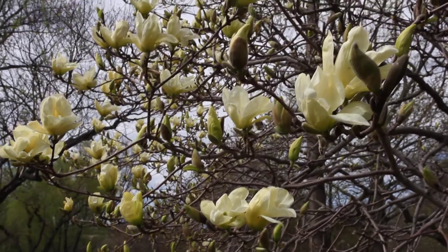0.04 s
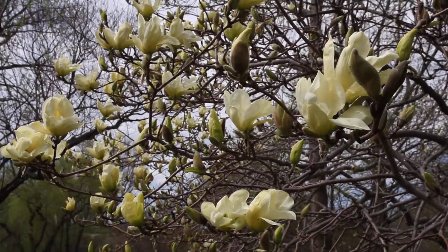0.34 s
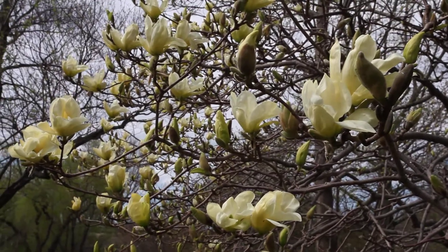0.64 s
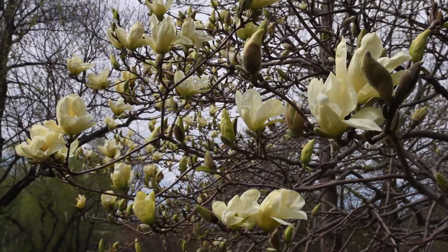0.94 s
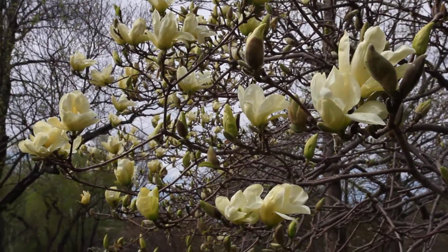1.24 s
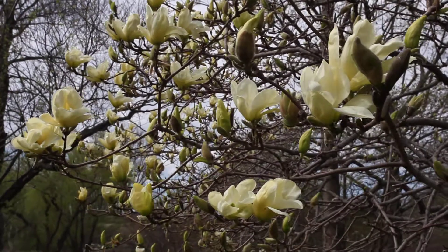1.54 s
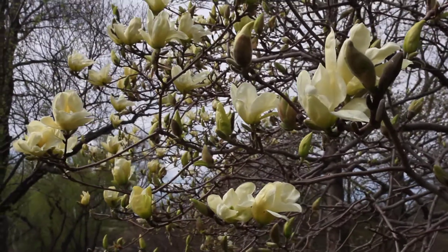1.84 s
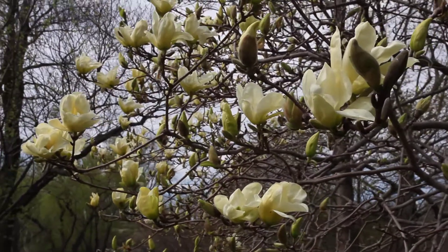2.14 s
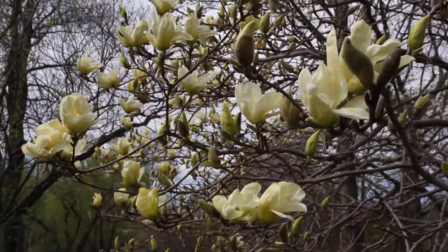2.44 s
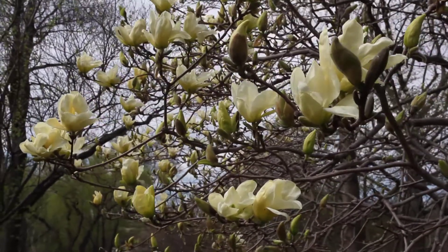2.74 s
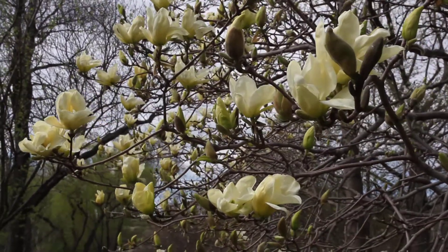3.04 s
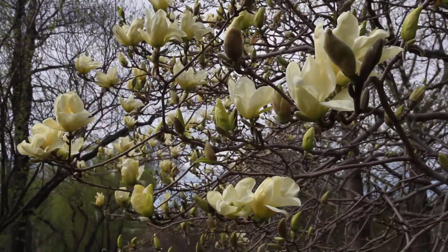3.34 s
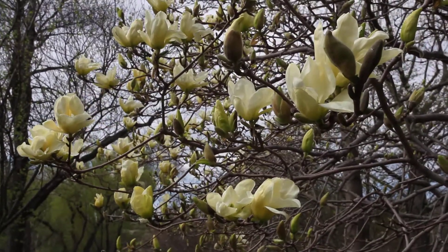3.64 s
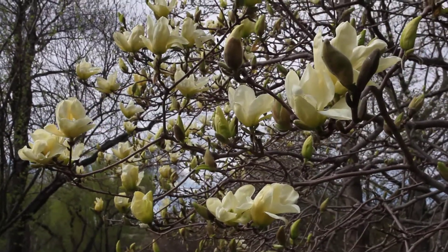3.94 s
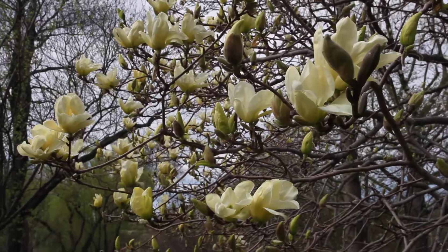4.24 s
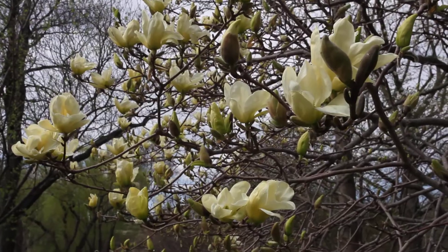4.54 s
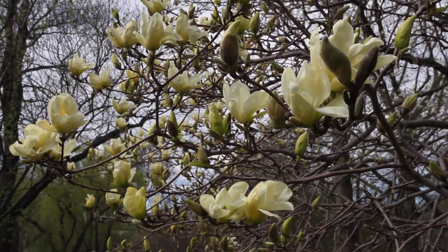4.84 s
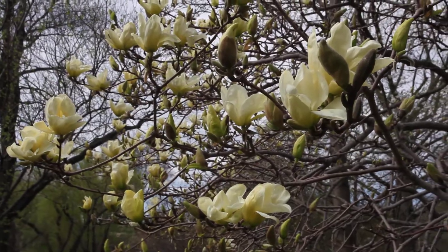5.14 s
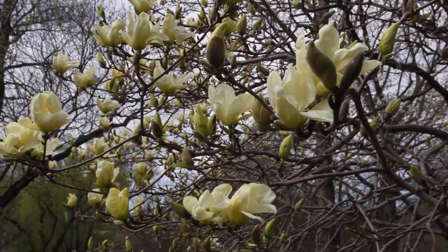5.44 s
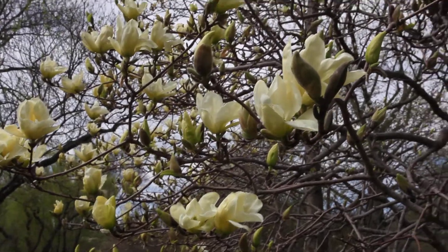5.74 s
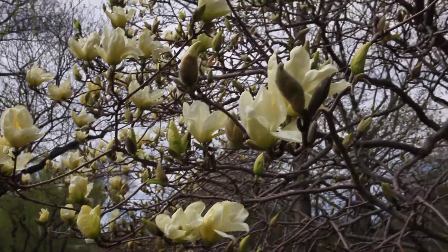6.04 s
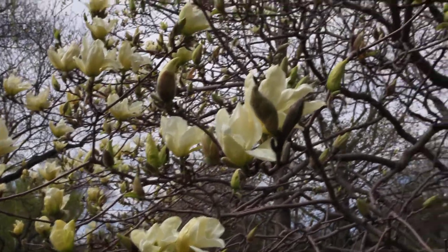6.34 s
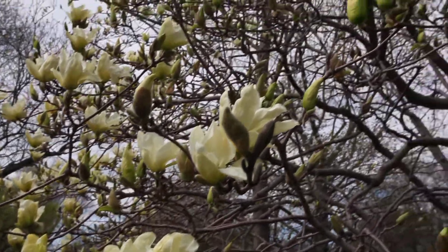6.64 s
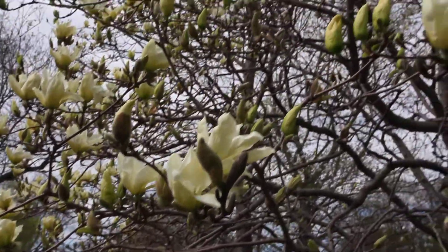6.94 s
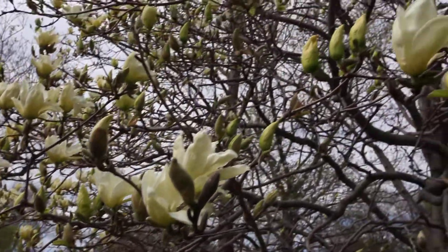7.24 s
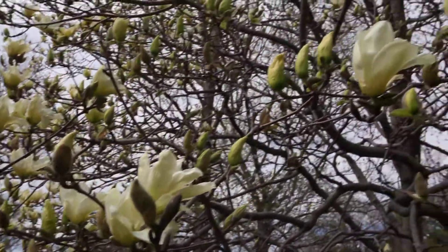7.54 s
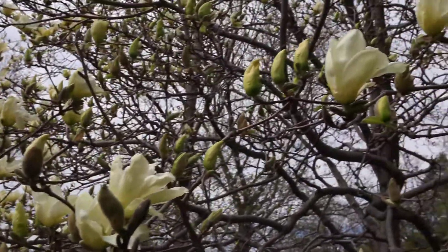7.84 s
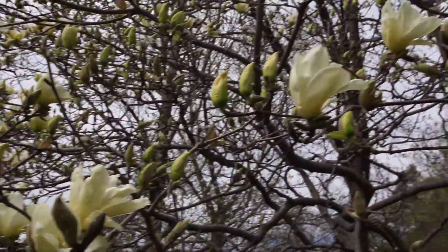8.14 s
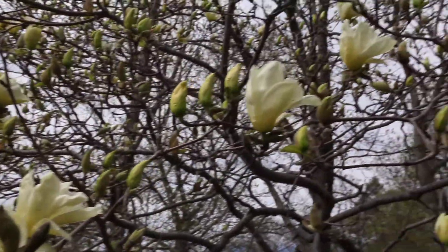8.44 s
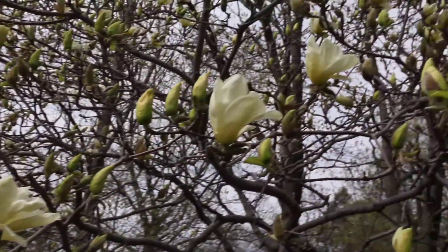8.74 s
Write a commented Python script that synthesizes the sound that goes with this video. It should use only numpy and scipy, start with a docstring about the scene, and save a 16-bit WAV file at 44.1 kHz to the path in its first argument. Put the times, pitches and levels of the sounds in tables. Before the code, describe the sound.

Songbirds sing short buzzy trills, whistles and sharp chips in a garden, over a faint steady haze of distant traffic.

```python
"""Blackbirds sing in a spring garden among tall bare trees, each voice made by airflow in the syrinx.
A buzzy trill opens over a far chorus and a haze of distant traffic. Soft mewing, whistles and far
engines follow, then the chatter and sharp chips of nearer birds, and small birds' slurs, two-note
calls and flicks. Songs recur, a few whistled notes and then a trill, and the chatter ends in a
fading series. Throughout, trunks and twigs scatter every call into reverberation."""
import sys
import numpy as np
from scipy import signal
from scipy.fft import rfft, irfft, next_fast_len
from scipy.io import wavfile

SR = 44100
rng = np.random.default_rng(int(sys.argv[2]) if len(sys.argv) > 2 else 0)


def digitize_waveform(pressure):
    """Quantize a signal to 16-bit integers and store it at the path in sys.argv[1].

    Rows of a 2-D input are taken as channels; values are limited to [-1, 1].
    """
    field = np.atleast_2d(pressure).T
    bounded = np.clip(field, -1, 1)
    quanta = np.round(bounded * 32767).astype(np.int16)
    wavfile.write(sys.argv[1], SR, quanta)


N = 392490
TIME = np.arange(N) / SR


def from_db(db):
    """Level is logarithmic: 20 dB is a tenfold amplitude."""
    return 10 ** (np.asarray(db) / 20)


def rms_one(x):
    """Normalisation to unit power."""
    return x / np.sqrt(np.mean(x ** 2) + 1e-20)


def noise(spectrum):
    """Spectral shaping: white noise weighted by a curve of level against frequency; rms 1."""
    size = next_fast_len(N)
    hz, db = np.transpose(spectrum)
    bins = np.maximum(np.fft.rfftfreq(size, 1 / SR), 1)
    gain = from_db(np.interp(np.log(bins), np.log(hz), db, right=-np.inf))
    return rms_one(irfft(rfft(rng.standard_normal(size)) * gain, size)[:N])


def flutter(rate_hz):
    """Random modulation: noise low-passed at the given rate; rms 1."""
    lowpass = signal.butter(2, rate_hz, fs=SR, output="sos")
    return rms_one(signal.sosfilt(lowpass, rng.standard_normal(N)))


def span(start, length):
    """Time window: the samples of a call and its progress u from 0 to 1."""
    at = np.arange(max(int(start * SR), 0), min(int((start + length) * SR), N))
    return at, np.clip((at / SR - start) / length, 0, 1)


def swell(u, rise, fall):
    """Amplitude envelope: a smooth rise and fall over shares of a call; silent outside 0-1."""
    return np.sin(np.pi / 2 * np.clip(np.minimum(u / rise, (1 - u) / fall), 0, 1)) ** 2


def glide(u, first, middle, last):
    """Parabolic contour through three points."""
    return first + (last - first) * u + (2 * middle - first - last) * 2 * u * (1 - u)


def syrinx(hz, shake, overtone_db=-33):
    """Frequency modulation: a nearly pure tone, its pitch shaken by a share of itself; rms about 1."""
    phase = 2 * np.pi * np.cumsum(hz * (1 + shake)) / SR
    return np.sqrt(2) * (np.sin(phase) + from_db(overtone_db) * np.sin(2 * phase))


def trills(whip_hz=5600, middle_hz=3700, top_hz=5000, depth=0.1153, sag=0.0308, grain_db=3.5, fade_db=2):
    """Fast pulsing is heard as buzz: each cycle holds a low note, top note, down-whip and middle note."""
    # trills: (start [s], end [s], first rate [pulses/s], last rate [pulses/s], low note [Hz],
    # relative levels of low note [dB], whip [dB], middle note [dB] and top note [dB], rasp [0-1])
    songs = [ (-0.048, 0.118, 55, 66, 2830, -20, -22.5, -22, -29, 0.14),
             (1.746, 2.233, 40, 40.7, 2880, -29, -23.5, -27, -33, 0.56),
             (2.113, 2.669, 53, 66, 2734, -28.5, -34, -41, -33, 0.36),
             (3.049, 3.582, 63.4, 67, 2828, -22.5, -29, -27.5, -29.5, 0.42),
             (4.07, 4.286, 100, 68, 2624, -29, -44, -32.5, -39, 0.57),
             (4.943, 5.485, 62, 52.5, 2708, -25.5, -23.5, -27.5, -33.5, 0.36),
             (7.309, 7.701, 38.3, 42, 2910, -25, -36, -24, -27, 0.53)]
    out, shakes, stagger = np.zeros(N), [flutter(660) for _ in range(4)], flutter(50)
    grains, stray = [flutter(330) for _ in range(4)], flutter(77)
    for start, end, first, last, low_hz, low_db, whip_db, middle_db, top_db, rasp in songs:
        at, u = span(start, end - start)
        cycle = (end - start) * (first * u + (last - first) * u * u / 2)
        cycle += 0.022 * (1 + 4 * rasp) * stagger[at]   # uneven pulse timing
        # each part's progress, from its onset and length as shares of a cycle
        low, top = (cycle % 1) / 0.68, ((cycle - 0.3) % 1) / 0.85
        whip, middle = ((cycle - 0.55) % 1) / 0.24, ((cycle - 0.72) % 1) / 0.62
        parts = [(low, low_hz * glide(np.minimum(low, 1), 1.07, 0.99, 1.04), low_db),
                 (whip, whip_hz + (middle_hz - whip_hz) * np.minimum(whip, 1), whip_db),
                 (middle, middle_hz * (1.04 - 0.08 * np.minimum(middle, 1)), middle_db),
                 (top, top_hz * (1.06 - 0.16 * np.minimum(top, 1)), top_db)]
        tension = 1 + sag * (0.5 - u) + 0.012 * stray[at]   # the pitch sinks as the air runs out
        envelope = swell(u, 0.027, 0.037) * from_db(-fade_db * (2 + u))
        for (progress, hz, db), shake, grain in zip(parts, shakes, grains):
            pulses = from_db(db + grain_db * (grain[at] - 0.6)) * swell(progress, 0.42, 0.059)
            tone = syrinx(hz * tension, depth * rasp * shake[at], overtone_db=-53)
            out[at] += envelope * pulses * tone
    return out


def traffic():
    """Many distant vehicles sum to broadband noise: a wavering rush of tyres over a low rumble."""
    # tyre rush and low rumble: (frequency [Hz], relative spectral density [dB])
    rush_spectrum = [(150, -31.5), (380, -13.5), (480, -6.5), (590, -6), (730, -2), (950, 0.5), (1100, -1),
                     (1500, -7), (2200, -15), (3500, -21)]
    rumble_spectrum = [(15, -40), (25, -14), (54, -2), (90, 2.5), (140, -0.5), (180, 0), (260, -4.5),
                       (380, -13.5), (700, -43)]
    # slow drift of the traffic: (time [s], rush level [dB], relative rumble level [dB])
    levels = [(0.0, -36, -41.5), (2.35, -37.5, -45.5), (4.71, -37.5, -45.5), (7.86, -40, -45),
              (8.9, -41.5, -45.5)]
    seconds, rush_db, rumble_db = np.transpose(levels)
    rush = noise(rush_spectrum) * from_db(np.interp(TIME, seconds, rush_db) + flutter(4.7))
    rumble = noise(rumble_spectrum) * from_db(np.interp(TIME, seconds, rumble_db) + 0.77)
    return rush + rumble


def background_hiss(level_db=-46, follows=0.83, waver_db=2.5):
    """Incoherent summation: far birds and leaves blur into a high hiss, which swells now and then."""
    # far birds and leaves: (frequency [Hz], relative spectral density [dB])
    spectrum = [(1500, -11.5), (2200, 1), (3000, 1.5), (4000, 4.5), (5300, 2.5), (7000, -2.5), (8500, -8.5),
                (10000, -23), (14000, -30)]
    # level of the high background hiss, swelling briefly under the whistles and trills:
    # (time [s], relative level [dB])
    levels = [(0.0, -55), (1.93, -50), (2.33, -54), (2.77, -54), (3.05, -37.5), (3.37, -51), (4.07, -40.5),
              (4.26, -52.5), (4.68, -60.5), (5.65, -47.5), (6.22, -56), (7.49, -55.5), (7.91, -58.5),
              (8.9, -47)]
    hiss_db = np.interp(TIME, *np.transpose(levels))
    drift_db = follows * (hiss_db - hiss_db.mean())
    return noise(spectrum) * from_db(level_db + drift_db + waver_db * flutter(17))


def air(level_db=-64.5):
    """Noise floor: the steady hiss of still air and microphone."""
    # hiss: (frequency [Hz], relative spectral density [dB])
    spectrum = [(2000, -5), (10000, -1), (13000, -5), (16000, -9)]
    return from_db(level_db) * noise(spectrum)


def far_birds(count=230, level_db=-47, low_hz=3000, high_hz=7200):
    """A random point process: faint slurs from all over the wood, at independent times and pitches."""
    out, shake = np.zeros(N), flutter(360)
    for when, length, pitch, slope, faintness in rng.random((count, 5)):
        at, u = span(when * N / SR, 0.025 + 0.066 * length)
        hz = low_hz * (high_hz / low_hz) ** pitch * (1 + 0.34 * (slope - 0.65) * u)
        envelope = from_db(level_db - 20 * faintness) * swell(u, 0.1, 0.57)
        out[at] += envelope * syrinx(hz, 0.0094 * shake[at])
    return out


def mewing(start_s, end_s, level_db, pitch_hz=1330, arch=0.025, notes_per_s=4.8):
    """A harmonic series without its fundamental: soft ragged arches, the third harmonic strongest."""
    out, shake, ragged = np.zeros(N), flutter(380), flutter(34)
    at, u = span(start_s, end_s - start_s)
    note = (u * (end_s - start_s) * notes_per_s) % 1
    pitch = pitch_hz * glide(note, 1 - arch, 1 + arch, 1 - arch)
    for harmonic, db in [(2, -10), (3, 0), (4, -7), (5, -8)]:
        envelope = from_db(level_db + db + 4 * ragged[at]) * swell(note, 0.4, 0.4)
        out[at] += envelope * syrinx(harmonic * pitch, 0.035 * shake[at])
    return out


def whistles(depth=0.112):
    """Linear frequency sweeps: clear notes, most of them leading into a trill."""
    # whistles: (start [s], length [s], first pitch [Hz], last pitch [Hz], level [dB], rasp [0-1])
    notes = [ (0.109, 0.19, 5270, 5080, -40.5, .2), (1.563, 0.049, 2130, 1920, -33.5, .5),
             (1.6, 0.077, 2467, 2520, -37.5, .35), (1.576, 0.18, 7410, 7520, -48, 0.13),
             (1.666, 0.088, 2080, 2213, -23, 0.11), (1.739, 0.12, 2230, 2280, -45, 0.25),
             (1.74, 0.025, 4970, 5400, -36, .2), (1.852, 0.05, 2285, 2284, -25.5, .02),
             (2.893, 0.082, 2432, 2420, -24.5, 0.12), (2.998, 0.022, 2545, 2630, -22.5, 0.1),
             (3.021, 0.062, 6230, 6300, -30.5, 0.84), (3.027, 0.27, 7500, 7200, -44.5, 0.7),
             (3.428, 0.096, 3560, 3575, -33, 0.2), (3.794, 0.098, 2300, 2360, -31.5, 0.44),
             (3.887, 0.099, 2385, 2430, -31, 0.23), (4.811, 0.03, 2620, 2500, -36, 0.5),
             (4.832, 0.2, 5080, 5460, -43, 0.3), (4.873, 0.024, 2645, 2670, -27.5, 0.2),
             (6.701, 0.23, 2850, 2620, -50, 0), (6.925, 0.16, 4930, 4850, -45, .15),
             (7.099, 0.065, 2547, 2330, -33, 0.4), (7.171, 0.068, 1640, 1720, -33.5, 0.1),
             (7.203, 0.12, 2720, 2760, -40, 0.06), (7.265, 0.031, 2230, 2440, -28, 0.6),
             (7.296, 0.022, 4970, 5400, -31, .2), (7.325, 0.062, 2470, 2530, -32, 0.5)]
    out, shake = np.zeros(N), flutter(530)
    for start, length, first, last, db, rasp in notes:
        at, u = span(start, length)
        tone = syrinx(first + (last - first) * u, depth * rasp * shake[at])
        out[at] += from_db(db) * swell(u, 0.25, 0.26) * tone
    return out


def engines(wander=0.0433, climb_hz_per_s=31):
    """Frequency jitter blurs the drones of far engines, which climb in pitch as they swell and fade."""
    # drones: (start [s], length [s], centre pitch [Hz], peak level [dB])
    drones = [(0.201, .9, 275, -45), (1.057, 0.58, 337, -47.5), (3.004, 0.58, 298.4, -50),
              (5.549, 0.61, 254, -46.5), (6.452, 0.69, 463, -47), (7.75, .5, 505, -45)]
    out, shake = np.zeros(N), flutter(38.4)
    for start, length, hz, db in drones:
        at, u = span(start, length)
        pitch = (hz + climb_hz_per_s * length * (u - 0.5)) * (1 + wander * shake[at])
        out[at] += from_db(db) * swell(u, 0.37, 0.42) * np.sin(2 * np.pi * np.cumsum(pitch) / SR)
    return out


def chatter(rise=0.062, buzz_hz=390, buzz_depth=0.69, lower_db=-14, rasp_s=0.0472, rasp_hz=4450):
    """Amplitude modulation makes a rising note nasal; over a lower voice, it cracks into a rasp."""
    # chatter notes: (start [s], length [s], pitch [Hz], level [dB])
    notes = [ (0.278, .036, 3720, -33.5), (1.842, .016, 3636, -20.5), (3.288, .036, 3950, -36),
             (3.335, 0.02, 3684, -25.5), (3.495, .025, 3620, -24.5), (3.654, 0.015, 3660, -27),
             (3.813, 0.022, 3550, -25.5), (3.977, 0.023, 3680, -24.5), (4.036, 0.03, 3630, -24.5),
             (4.163, 0.027, 3770, -24.5), (5.124, .031, 3915, -25), (5.287, 0.012, 4280, -25.5),
             (5.443, 0.015, 4290, -24), (6.48, 0.0085, 3440, -23.5), (7.303, .026, 3580, -30.5),
             (7.979, 0.013, 3520, -38)]
    # a clipped note lifts the lower voice: (note length [s], lower voice pitch [Hz])
    lower_voice = [(.013, 2863), (.019, 2043)]
    fading_series = [(8.142 + k * 0.1305, 0.01, 3600, -25 - 2.05 * k) for k in range(6)]
    out, shake, whim = np.zeros(N), flutter(1070), flutter(4)
    nasal = 1 + buzz_depth * np.sin(2 * np.pi * buzz_hz * TIME)
    lengths, lower_pitches = np.transpose(lower_voice)
    for start, length, hz, db in notes + fading_series:
        at, u = span(start, length)
        harsh = np.interp(length, lengths, [0.052, 0.011])   # clipped notes are harsher
        pitch = hz * (1 + rise * (1 + 0.53 * whim[at]) * (u - 0.5))
        note = nasal[at] * syrinx(pitch, harsh * shake[at], overtone_db=-19)
        out[at] += from_db(db) * swell(u, 0.35, 0.19) * note

        at, u = span(start - 0.008, 0.0356)
        lower_hz = np.interp(length, lengths, lower_pitches)
        lower = syrinx(lower_hz * glide(u, 1.0, 0.91, 0.776), 0.068 * shake[at])
        out[at] += from_db(db + lower_db) * swell(u, 0.15, 0.76) * lower

        at, u = span(start + 0.8 * length, rasp_s)
        rasp_db = -29.5 + 0.61 * (db + 24.5)   # follows the note's level in part
        rasp = syrinx(glide(u, hz * 1.12, rasp_hz, rasp_hz), 0.137 * shake[at], overtone_db=-25)
        out[at] += from_db(rasp_db) * swell(u, 0.094, 0.72) * rasp
    return out


def runs(depth=0.018, uneven_db=5):
    """Periodic repetition: small birds each sing one soft slur at an even pace."""
    # runs of slurs: (start [s], end [s], period [s], note length [s],
    # first pitch [Hz], middle pitch [Hz], last pitch [Hz], level [dB])
    phrases = [ (0.42, 0.6, 0.025, 0.031, 5870, 5160, 4870, -49.5),
               (0.812, 1.33, 0.14, 0.044, 6900, 5580, 4700, -42),
               (4.325, 4.49, .111, 0.02, 3850, 3400, 2700, -42.5),
               (4.303, 4.47, .11, 0.034, 6900, 6460, 5830, -53),
               (5.931, 6.5, .126, 0.03, 3010, 2680, 2300, -47),
               (7.914, 8.16, 0.16, .033, 4060, 4700, 4230, -45.5)]
    out, shake = np.zeros(N), flutter(330)
    for start, end, period, length, first, middle, last, db in phrases:
        for onset in np.arange(start, end, period):
            at, u = span(onset, length)
            slur = syrinx(glide(u, first, middle, last), depth * shake[at])
            out[at] += from_db(db + uneven_db * shake[at[0]]) * swell(u, 0.2, 0.26) * slur
    return out


def chips(full_effort_db=-19, depth=0.14, grain_db=8, edge_fade_db=8):
    """Biphonation: both sides of the syrinx sound at once in a short harsh arch, with a puff of hiss."""
    # chips: (start [s], length [s], then nominal values of the two voices:
    # lower pitch [Hz], upper pitch [Hz], lower level [dB], upper level [dB])
    calls = [ (0.658, 0.0346, 4050, 4820, -23.5, -21.5), (1.278, 0.041, 3980, 5490, -22.5, -22.5),
             (2.425, 0.028, 3650, 5340, -22, -44), (2.561, 0.049, 4400, 5200, -41, -33),
             (2.685, 0.05, 4210, 5400, -31, -33.5), (2.826, 0.05, 4300, 5100, -41, -27),
             (2.935, 0.06, 3830, 5030, -32, -30), (3.012, .043, 4000, 4800, -26.5, -27.5),
             (3.577, 0.046, 4050, 5410, -26, -22), (4.563, 0.0387, 3940, 4800, -20.5, -22),
             (5.581, 0.029, 4310, 5090, -26.5, -28), (5.668, 0.034, 4070, 5200, -22, -24),
             (5.773, .0323, 4030, 5120, -36, -31), (5.939, 0.041, 4030, 5300, -23.5, -23),
             (6.877, .039, 4170, 5480, -22, -21), (7.139, 0.037, 3980, 4950, -22.5, -28),
             (7.605, 0.034, 3620, 5020, -24.5, -24.5), (8.284, 0.032, 3740, 5180, -18.5, -30),
             (8.819, 0.032, 4080, 5550, -23, -19.5)]
    # a chip's hiss and its bright edge: (frequency [Hz], relative spectral density [dB])
    hiss_spectrum = [(1000, -7), (2200, -2.5), (3500, 7), (6000, 0), (8000, -5), (10000, -30), (14000, -40)]
    edge_spectrum = [(5000, -30), (8000, 8), (11000, -7), (15500, -13)]
    out, hiss, edge, grain = np.zeros(N), noise(hiss_spectrum), noise(edge_spectrum), flutter(640)
    left, right = flutter(860), flutter(850)
    for start, length, low_hz, high_hz, low_db, high_db in calls:
        at, u = span(start, length)
        effort_db = max(low_db, high_db) - full_effort_db
        rasp = np.interp(effort_db, [-12.5, 0], [0.713, 0.35])   # weaker chips are rougher
        hiss_db = -30.5 + 0.15 * effort_db   # and keep more of their hiss
        edge_db = -44.5 + effort_db + 20 * (high_hz - 5360) / 1300   # brighter when pushed higher
        arch = glide(u, 0.84, 0.98, 0.82)
        harsh = depth * rasp * glide(u, 1.58, 0.83, 1.09)   # roughest as the voice starts and stops
        lower = from_db(low_db) * syrinx(low_hz * np.sqrt(arch), harsh * left[at])
        upper = from_db(high_db) * syrinx(high_hz * arch, harsh * right[at])
        voices = (lower + upper) * from_db(grain_db * rasp * (grain[at] - 1))
        puff = from_db(hiss_db) * hiss[at] + from_db(edge_db + edge_fade_db * (0.5 - u)) * edge[at]
        out[at] += swell(u, 0.35, 0.21) * (voices + puff)
    return out


def pip_calls(pip_hz=5390, pip_s=0.025, whistle_hz=3905, lag_s=0.04, sag=0.0204, fade_db=2.5):
    """A falling interval: a high pip, then a whistle about a fourth lower that sags and fades."""
    # two-note calls: (start [s], pip level [dB], whistle length [s], whistle level [dB])
    calls = [(0.976, -52, .15, -34), (2.166, -28.5, 0.24, -33.5), (2.618, -43, 0.24, -34),
             (6.174, -38, 0.16, -40.5), (6.444, -36.5, 0.096, -45), (6.644, -39, 0.069, -41.5)]
    out, shake = np.zeros(N), 0.0099 * flutter(460)
    for start, pip_db, length, whistle_db in calls:
        at, u = span(start, pip_s)
        out[at] += from_db(pip_db) * swell(u, 0.24, 0.23) * syrinx(pip_hz, shake[at], overtone_db=-45)
        at, u = span(start + lag_s, length)
        whistle = syrinx(whistle_hz * (1 + sag * (0.5 - u)), shake[at], overtone_db=-45)
        out[at] += from_db(whistle_db - fade_db * u) * swell(u, 0.17, 0.39) * whistle
    return out


def flicks(arc_hz=(5980, 7400, 8230), depth=0.013):
    """Time scaling: the same thin upward sweep, sung faster or slower."""
    # flicks: (start [s], length [s], level [dB])
    calls = [(2.075, 0.028, -41), (2.476, 0.026, -42), (2.911, .047, -40), (3.11, .013, -30),
             (3.366, 0.014, -33.5), (5.357, 0.013, -37.5)]
    out, shake = np.zeros(N), flutter(510)
    for start, length, db in calls:
        at, u = span(start, length)
        out[at] += from_db(db) * swell(u, 0.089, 0.42) * syrinx(glide(u, *arc_hz), depth * shake[at])
    return out


def trees(direct, near_db, near_t60, far_db, far_t60):
    """Scattering: nearby twigs smear each call; distant trunks return a long faint tail."""
    # sound scattered by the trees: (frequency [Hz], relative level [dB])
    spectrum = [(1500, -21), (2500, 4), (4000, 2.5), (6000, 3.5), (9000, 4), (15000, -16)]
    t, scatter = TIME[:SR], noise(spectrum)[:SR]
    echo = 0
    for db, t60 in [(near_db, near_t60), (far_db, far_t60)]:
        build_up = 1 - np.exp(-t / (0.0012 + t60 / 50))
        tail = scatter * from_db(-60 * t / t60) * build_up
        echo = echo + from_db(db) * tail / np.sqrt(np.sum(tail ** 2))
    return direct + signal.fftconvolve(direct, echo)[:N]


def scene():
    """Superposition in mono: near callers are mostly direct sound, far singers more reverberant."""
    near = trees(chips() + chatter(), near_db=-10, near_t60=0.19, far_db=-22, far_t60=0.89)
    singers = trees(trills(), near_db=-8, near_t60=0.1, far_db=-12, far_t60=0.6)
    small_birds = pip_calls() + flicks() + runs()
    small_birds += mewing(0.8, 1.5, level_db=-44) + mewing(0.089, 0.26, level_db=-46.5)
    small_birds += far_birds() + far_birds(count=60, level_db=-47.5, low_hz=4680, high_hz=7360)
    clear = trees(whistles() + small_birds, near_db=-10, near_t60=0.18, far_db=-18, far_t60=1.0)
    return (near + singers + clear + traffic() + background_hiss() + engines() + air())[None, :]


def record(dry):
    """Band limiting: a steep low-pass filter cuts the treble above 15.8 kHz."""
    return signal.sosfilt(signal.ellip(12, 0.1, 80, 15800, fs=SR, output="sos"), dry)


dry = scene()
out = record(dry)
digitize_waveform(out)
```